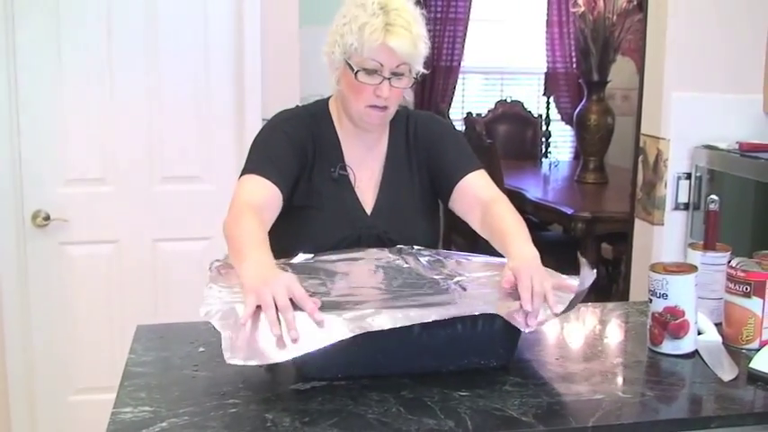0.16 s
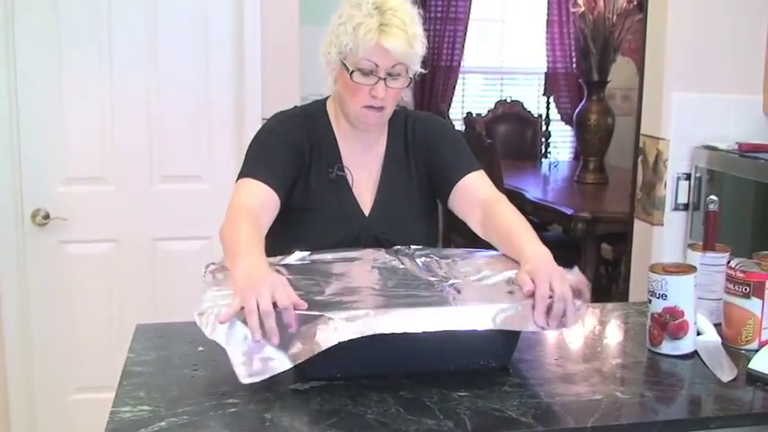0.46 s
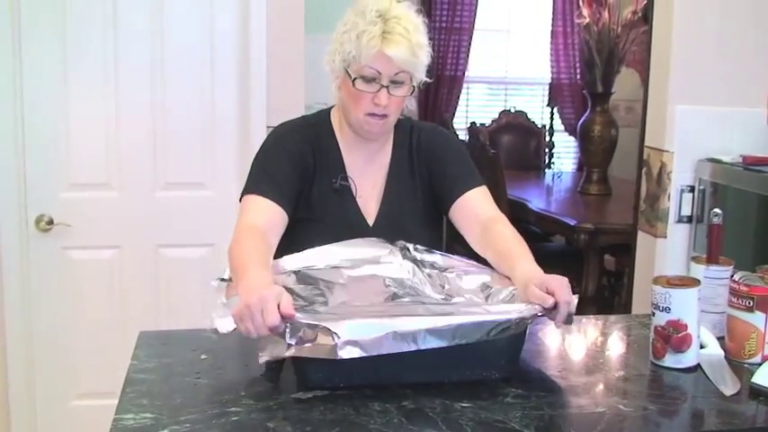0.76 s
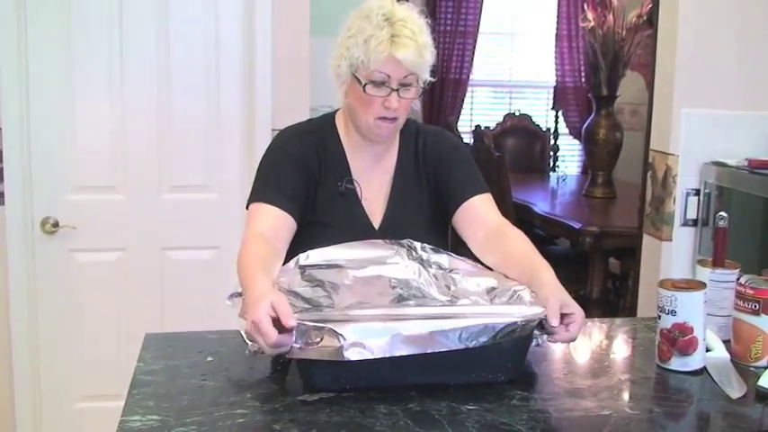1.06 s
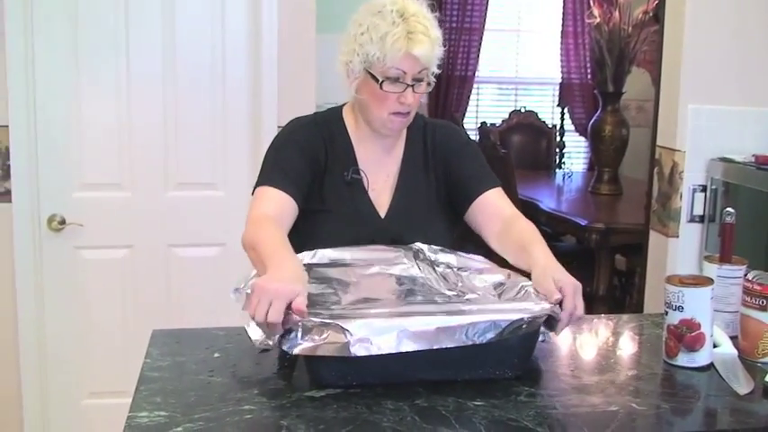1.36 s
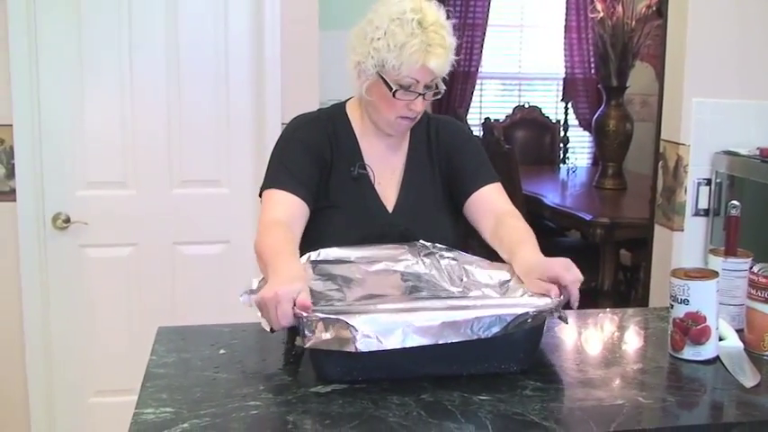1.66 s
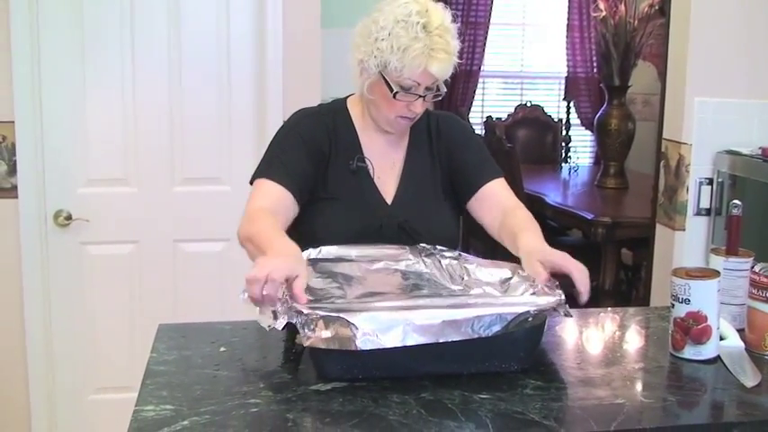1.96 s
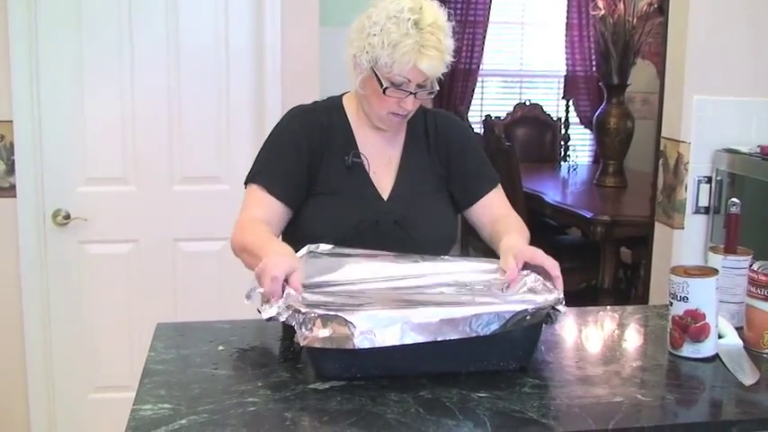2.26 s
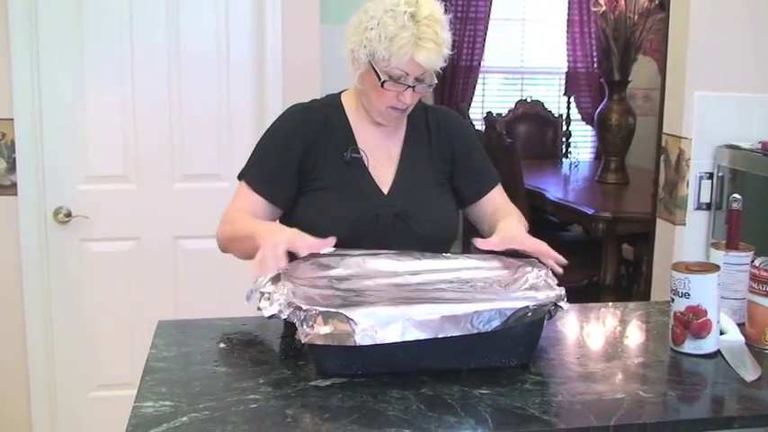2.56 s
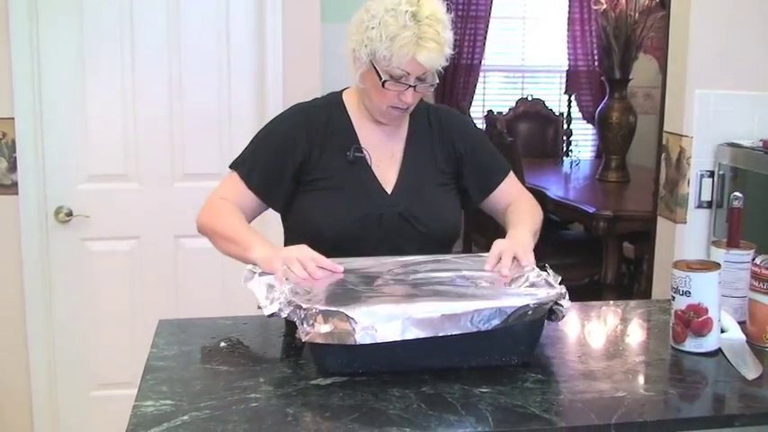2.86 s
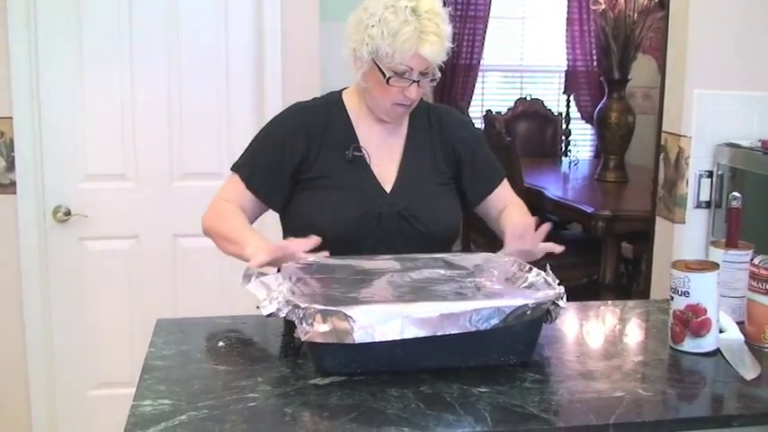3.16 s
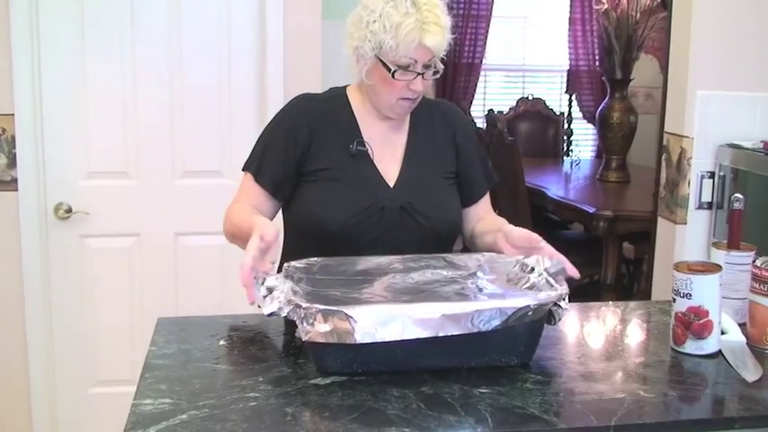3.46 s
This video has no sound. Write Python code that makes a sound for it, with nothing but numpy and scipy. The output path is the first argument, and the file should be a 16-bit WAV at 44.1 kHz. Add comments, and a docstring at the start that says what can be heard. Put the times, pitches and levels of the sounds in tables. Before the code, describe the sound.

Aluminium foil crinkles close by in a quiet kitchen, crackling unevenly with small snaps as it is spread over a pan. Dents pop at about 1.2 and 2 seconds. Louder, brighter bursts of crimping and smoothing come from 2.2 to 3.3 seconds, with a brief pause near 2.6, and a softer crinkle follows around 3.5. From 1.2 seconds the pan occasionally bumps softly on the counter.

```python
"""A kitchen, one microphone close to the counter: aluminium foil is spread over a roasting pan, tucked
round the rim, crimped and smoothed flat. The hands set off showers of tiny buckles that crackle, tick in
the treble and flex the wide sheet. Single creases snap louder and a few dents pop through.
The pan bumps softly on the counter, and the room rings briefly after the foil, over quiet room tone."""
import sys
import numpy as np
from scipy import signal
from scipy.fft import rfft, irfft, next_fast_len
from scipy.io import wavfile
from scipy.ndimage import uniform_filter1d, map_coordinates

SR = 44100
rng = np.random.default_rng(int(sys.argv[2]) if len(sys.argv) > 2 else 0)


def store_pcm(level_fs):
    """Save levels as 16-bit WAV."""
    pcm = np.round(np.clip(level_fs, -1, 1) * 32767).astype(np.int16)
    wavfile.write(sys.argv[1], SR, np.atleast_2d(pcm).T)


N = 158760


def crinkle(buckles_per_s=5200, size_spread_db=3):
    """The hands drive one stream of buckles: crackle, flexing and fine ticks over a dull handling rumble."""
    # One table for each move of the hands.
    # Each row: time in seconds, then relative levels of crackle, flexing and ticks in dB.
    spread = [(0.0, -23, -26, -24), (0.088, -31, -32, -29.5), (0.12, -25, -30, -36),
              (0.13, -23.5, -24.5, -21), (0.2, -23, -28.5, -25.5), (0.228, -20.5, -30, -20.5),
              (0.272, -21, -25.5, -22), (0.288, -26, -27.5, -26.5), (0.376, -22, -23.5, -22),
              (0.432, -26.5, -33.5, -31), (0.468, -24, -27, -27), (0.484, -25, -25, -22),
              (0.504, -26.0, -25, -34)]
    fold = [(0.536, -19, -26.5, -18.5), (0.568, -20, -21, -21.5), (0.592, -24.5, -31.5, -32),
            (0.664, -22, -24, -24.5), (0.72, -19.5, -24, -24), (0.756, -18.5, -21, -17),
            (0.792, -19, -26, -18.5), (0.848, -19.5, -27, -26), (0.872, -24, -28, -28.5),
            (0.968, -16.5, -22.5, -18), (1.008, -19.5, -24, -23), (1.04, -20, -21.5, -27),
            (1.112, -39, -45, -59)]
    grip = [(1.136, -22, -27, -32), (1.16, -26.5, -28.5, -37), (1.2, -20.5, -27, -24.5),
            (1.216, -16, -25, -16.5), (1.296, -28, -31, -33), (1.32, -21.5, -30, -25.5),
            (1.388, -30.5, -32.5, -45)]
    tuck = [(1.408, -18, -22.5, -21), (1.48, -25.5, -32.5, -32.5), (1.52, -20.0, -24, -25),
            (1.608, -19.5, -23, -29.5), (1.664, -18.5, -26.5, -21.5), (1.712, -21, -22.5, -34),
            (1.744, -24, -33.5, -29), (1.832, -30.5, -36, -46)]
    crimp = [(1.896, -30, -37, -42), (1.92, -21.5, -23, -27.5), (1.968, -20, -26, -30),
             (2.024, -19.5, -29.5, -26), (2.064, -38, -41.0, -47), (2.088, -47, -48, -60.0),
             (2.12, -28, -33, -45), (2.136, -19, -31, -27.5), (2.185, -20, -29, -29),
             (2.208, -9.5, -18.5, -10.5), (2.224, -13.5, -23.5, -18), (2.304, -13.5, -22.0, -18.5)]
    squeeze = [(2.376, -27.5, -34.5, -38), (2.432, -16.5, -19, -24.5), (2.456, -18.5, -27.5, -29),
               (2.488, -11, -19, -14.5), (2.52, -17.5, -42, -27), (2.552, -45, -37, -57),
               (2.632, -53, -46, -63)]
    smooth = [(2.712, -64, -47, -60), (2.728, -34, -34.5, -50), (2.777, -11.5, -22.5, -16.5),
              (2.912, -18.0, -26, -25.5), (2.92, -14, -24, -20.5), (3.056, -14.5, -22, -20),
              (3.104, -21.5, -33, -29.5), (3.152, -19, -23, -29), (3.193, -10.5, -26, -13.5),
              (3.352, -52, -47.0, -78)]
    pinch = [(3.392, -51, -41, -64), (3.407, -27.5, -34, -40), (3.424, -21, -33, -27.0),
             (3.464, -18, -25.5, -25), (3.48, -17.5, -38, -23.5), (3.504, -21.5, -31.5, -32),
             (3.56, -21.5, -33, -36), (3.6, -30, -37, -44)]
    times, *levels = np.vstack([spread, fold, grip, tuck, crimp, squeeze, smooth, pinch]).T
    clump_db = wobble(knots_per_s=70)  # uneven buckling flutters the level
    crackle_db, flex_db, tick_db = [np.interp(np.arange(N) / SR, times, db) + clump_db for db in levels]
    count = int(buckles_per_s * N / SR)
    buckles = (rng.random(count) * N).astype(int), size_spread_db * rng.standard_normal(count)
    crackle = amp(crackle_db - 0.03) * shower(buckles, 1560, 6820, cycles=1.65, scatter_db=3, size=96)
    flex = amp(flex_db - 1) * shower(buckles, 165, 1517, cycles=0.73, scatter_db=9, size=192)
    ticks = amp(tick_db) * tick_runs() * shower(buckles, 6450, 16000, cycles=2, scatter_db=1, size=64)
    rumble = amp(flex_db - 22) * noise(lambda hz: band(hz, 89, 132, order=6))
    return crackle + flex + ticks + rumble


def shower(buckles, lo_hz, hi_hz, cycles, scatter_db, size, even_s=0.018):
    """Each buckle rings a facet of its own pitch for a few cycles; the sum is held near rms 1."""
    start, size_db = buckles
    pitch, phase, chance = rng.random((len(start), 3)).T[:, :, None]
    facet_hz = lo_hz / 2 + pitch * (hi_hz * 1.175 - lo_hz / 2)
    turns = facet_hz * np.arange(size) / SR
    grains = np.exp(-turns / cycles) * np.sin(2 * np.pi * (turns + phase))
    grains /= np.linalg.norm(grains, axis=1, keepdims=True)
    grains *= amp(size_db[:, None] + scatter_db * (2 * chance - 1))
    samples = start[:, None] + np.arange(size)
    stream = foil(np.bincount(samples.ravel(), grains.ravel(), N)[:N], lo_hz, hi_hz)
    power = np.abs(uniform_filter1d(stream ** 2, int(even_s * SR) + 1))
    return stream / np.sqrt(power + 1e-4)


def tick_runs(runs_per_s=34, fade_s=0.011, spread_db=2.5, share=0.37):
    """Gain of small avalanches of ticks running along a crease: sudden start, quick fade."""
    count = int(runs_per_s * N / SR)
    start = ((np.arange(count) + rng.random(count)) / count * (N - 1)).astype(int)
    run_db = spread_db * np.clip(rng.standard_normal(count), -2, 2)
    energy = np.bincount(start, amp(run_db) ** 2, N)
    power = signal.lfilter([1], [1, -np.exp(-1 / (fade_s * SR))], energy)
    mean_power = np.abs(uniform_filter1d(power, SR // 10)) + 1e-9
    return np.sqrt(1 - share + share * power / mean_power)


def foil(x, lo_hz, hi_hz):
    """The sheet colours one band of x: first loose, then tucked under the palms, then tight on the pan."""
    # The sheet's spectrum in each state. Each row: frequency in Hz, relative level in dB.
    loose = [(88, -46), (150, -13.5), (279, -13), (520, -3.5), (860, -4), (1630, -6), (2150, -5),
             (3160, -5.5), (9390, -11.5), (12800, -17.5), (15600, -27)]
    tucked = [(88, -49), (150, -15), (396, -8), (463, -3), (752, -9), (931, 0), (1130, -4), (2320, -3.5),
              (3700, -4), (4760, -5), (7290, -12.5), (11600, -14.5), (15600, -22.5)]
    tight = [(88, -51), (150, -12), (346, -12), (540, -9), (656, -5.5), (723, -4), (1150, -7.5), (2230, -2),
             (3100, -2.5), (4320, 0), (6750, -4), (8680, -8.5), (12600, -11), (15600, -17.5)]
    stage = np.interp(np.arange(N) / SR, [1.3, 1.5, 2.05, 2.2], [0, 0.83, 1.4, 2])  # 0 loose, 2 tight
    out = np.zeros(N)
    for k, colour in enumerate((loose, tucked, tight)):
        gain = lambda hz: amp(along(colour, hz)) * hollow(hz, k / 2) * band(hz, lo_hz, hi_hz, order=9)
        crossfade = np.maximum(0, 1 - np.abs(stage - k))
        out += crossfade * unit(coloured(x, gain))
    return out


def hollow(hz, tension):
    """Gain of the covered pan's resonances; most fade as the sheet tightens (tension 0 to 1)."""
    # Each row: centre in Hz, width in Hz, strength in dB when loose, strength in dB when tight.
    resonances = [(338, 57, -4.5, -22), (526, 28, 0, 0), (730, 70, -11, -22), (1252, 50, -0.5, -30),
                  (1830, 190, -4, -14), (2120, 150, -13, -15), (4800, 88, -13, -17.5)]
    return 1 + sum(amp(loose + tension * (tight - loose)) / (1 + (2 * (hz - centre) / width) ** 2)
                   for centre, width, loose, tight in resonances)


def snaps(level_db=-5.5, t60_s=0.022, treble_db=5, split_hz=7100):
    """A crease gives way in a short burst, dull or bright."""
    # Each row: start in seconds, relative level in dB, relative brightness in dB.
    creases = [(0.0998, -13, -12), (0.1307, -12, -7), (0.2033, -8.5, -6), (0.2252, -9, -4),
               (0.3071, -10, -11), (0.34, -11, -16), (0.4147, -15, -16), (0.4465, -7.5, -5),
               (0.527, -13, -5), (0.5695, -10, -5), (0.6411, -8, -13), (0.7366, -3, -16), (0.7944, -8, -13),
               (0.8318, -8.5, -1.5), (0.9325, -3.5, -7.5), (0.9639, -4, -6), (1.005, -5.5, -0.5),
               (1.0743, -13, -10), (1.094, -10.5, -10), (1.1373, -15.5, -4), (1.1517, -9, -20),
               (1.2078, -9, -5), (1.2804, -8.5, -5), (1.314, -11, -2), (1.397, -12.5, -3),
               (1.7062, -4.5, -20), (1.75, -16, -2), (1.842, -12.5, -9), (2.012, -4, -18),
               (2.104, -11.5, -15), (2.2019, -18, -30), (2.599, -23, -5), (2.725, -23, -28),
               (2.7585, -4, -21), (2.7792, -3, -7), (3.159, -4.5, -18), (3.4203, -12, -12)]
    t, middle, treble = np.arange(N) / SR, np.zeros(N), np.zeros(N)
    for start, db, bright_db in creases:
        i = round(start * SR)
        fall = amp(db + level_db - 60 * t[:min(SR // 10, N - i)] / t60_s)
        middle[i:i + len(fall)] += fall
        treble[i:i + len(fall)] += fall * amp(bright_db + treble_db)
    body = middle * foil(rng.standard_normal(N), 340, split_hz)
    edge = treble * foil(rng.standard_normal(N), split_hz, 22000)
    return body + edge


def pops(spread_octaves=0.41, attack_s=0.00048, t60_s=0.014, count=14):
    """A dent flips over: a cluster of modes round its pitch rings for a few milliseconds."""
    # Each row: start in seconds, peak level in dB before the room, pitch in Hz.
    dents = [(1.219, -7.5, 2670), (1.2231, -3.5, 1660), (1.235, -16, 2800), (1.9641, -3, 2460),
             (1.978, -9.5, 2630)]
    t, out = np.arange(SR // 20) / SR, np.zeros(N)
    fall = amp(-60 * t / t60_s) * (1 - np.exp(-t / attack_s))
    for start, db, hz in dents:
        modes = hz * 2 ** (spread_octaves * rng.standard_normal(count))
        ring = fall * np.sin(2 * np.pi * (np.outer(t, modes) + rng.random(count))).sum(axis=1)
        out[round(start * SR):][:len(t)] += amp(db) * ring / np.abs(ring).max()
    return out


def pan_bumps(attack_s=0.0025):
    """Pressing the rim thuds the pan against the counter."""
    # Each row: start in seconds, level in dB, seconds to fall by 60 dB.
    thuds = [(1.22, -33, 0.27), (1.62, -31, 0.3), (1.99, -32, 0.36), (2.21, -31.5, 0.39),
             (2.779, -31, 0.58), (3.031, -31, 0.3), (3.18, -41.5, 0.3), (3.429, -42, 0.5)]
    # The thud's spectrum. Each row: frequency in Hz, relative level in dB.
    colour = [(15, -6), (33, 4), (55, -7), (115, -1), (180, -23.5), (500, -54)]
    t = np.arange(N) / SR
    level = sum(amp(db - 60 * np.maximum(t - start, 0) / t60) * np.clip((t - start) / attack_s, 0, 1)
                for start, db, t60 in thuds)
    return level * noise(lambda hz: amp(along(colour, hz)))


def kitchen(x, room_db, near_share=0.27, near_t60_s=0.036, size=128):
    """Direct sound, a quick return off counter and pan, and a room tail that dies band by band."""
    # The room's decay. Each row: frequency in Hz, seconds to fall by 60 dB.
    reverb_times = [(150, 0.18), (700, 0.42), (3000, 0.39), (7000, 0.28), (15000, 0.24)]
    hz, t, spectra = signal.stft(x, SR, nperseg=size)
    far, near = [amp(-60 * t / t60) ** 2 * (t > 0) for t60 in (along(reverb_times, hz)[:, None], near_t60_s)]
    decay = (1 - near_share) * far / far.sum(axis=1, keepdims=True) + near_share * near / near.sum()
    energy = signal.fftconvolve(np.abs(spectra) ** 2, decay, axes=1)[:, :len(t)]
    grain = signal.stft(rng.standard_normal(N), SR, nperseg=size)[2]
    tail = signal.istft(np.sqrt(np.abs(energy)) * grain / np.std(grain), SR, nperseg=size)[1][:N]
    # The tail keeps the foil's colour.
    bins_hz, (foil_power, tail_power) = signal.welch([x, tail], SR, nperseg=8 * size)
    tail = filtered(tail, lambda hz: np.interp(hz, bins_hz, np.sqrt(foil_power / (tail_power + 1e-20))))
    return (x + amp(room_db) * tail) / np.sqrt(1 + amp(room_db) ** 2)


def room_tone(level_db=-49.5):
    """The kitchen's quiet, steady background, mostly bass."""
    # Each row: frequency in Hz, relative level in dB.
    colour = [(20, 1), (60, 1.5), (150, -8), (500, -28), (2000, -41), (15000, -57)]
    return amp(level_db) * noise(lambda hz: amp(along(colour, hz)))


def amp(db):
    """Decibels to gain."""
    return 10 ** (np.asarray(db) / 20)


def unit(x):
    """Scale to rms 1."""
    return x / np.sqrt(np.mean(x ** 2) + 1e-20)


def along(points, hz):
    """Read (Hz, value) points on a log axis."""
    knots_hz, values = np.transpose(points)
    return np.interp(np.log(hz + 1), np.log(knots_hz + 1), values)


def band(hz, lo_hz, hi_hz, order):
    """Gain of a band-pass."""
    return ((1 + (lo_hz / (hz + 1)) ** order) * (1 + (hz / hi_hz) ** order)) ** -.5


def filtered(x, response):
    """Multiply the spectrum of x by a response of frequency."""
    size = next_fast_len(N + SR // 2)
    return irfft(rfft(x, size) * response(np.fft.rfftfreq(size, 1 / SR)), size)[:N]


def coloured(x, gain, size=4096):
    """Causal filter with the given gain over frequency."""
    cepstrum = irfft(np.log(np.maximum(gain(np.fft.rfftfreq(size, 1 / SR)), 1e-6)))
    cepstrum[1:size // 2] *= 2
    cepstrum[size // 2 + 1:] = 0
    return signal.fftconvolve(x, irfft(np.exp(rfft(cepstrum))))[:N]


def noise(response):
    """Noise of the given spectrum at rms 1."""
    return unit(filtered(rng.standard_normal(N), response))


def wobble(knots_per_s):
    """A smooth random curve."""
    return map_coordinates(rng.standard_normal(1024), [np.arange(N) * knots_per_s / SR], mode="wrap")


def scene():
    """Foil and pan close by, the kitchen behind them, in mono."""
    background = room_tone()
    crinkling = kitchen(crinkle() + snaps(), room_db=1)
    popping = kitchen(pops(), room_db=-5.5)
    return (crinkling + popping + pan_bumps() + background)[None]


def record(dry):
    """The microphone rounds off the tallest peaks and keeps nothing above its band limit."""
    ceiling, top_hz = 0.85, 15780
    rounded = dry[0] / (1 + np.abs(dry[0] / ceiling) ** 6) ** (1 / 6)
    return filtered(rounded, lambda hz: hz < top_hz)[None]


dry = scene()
out = record(dry)
store_pcm(out)
```